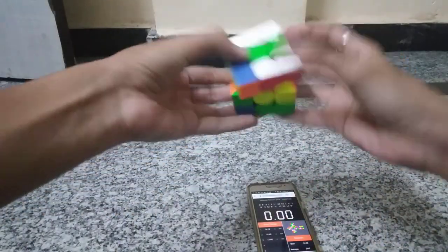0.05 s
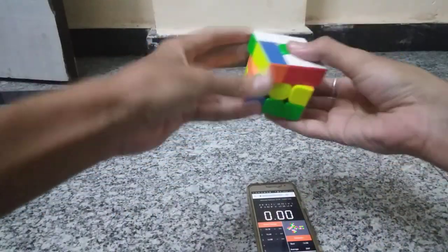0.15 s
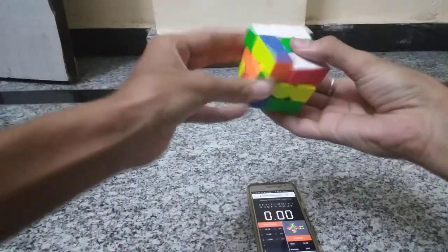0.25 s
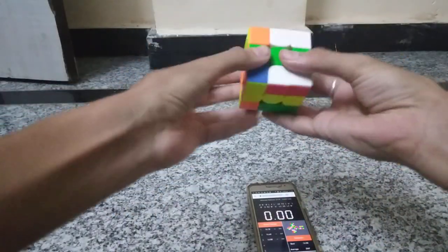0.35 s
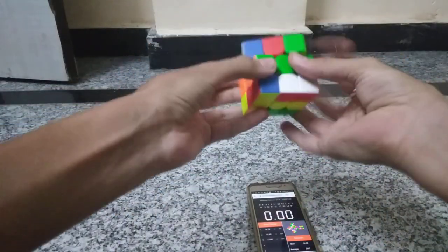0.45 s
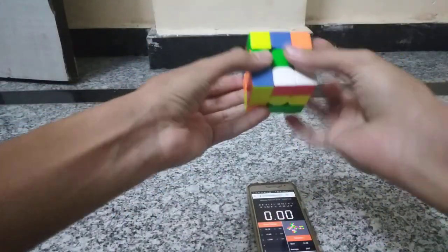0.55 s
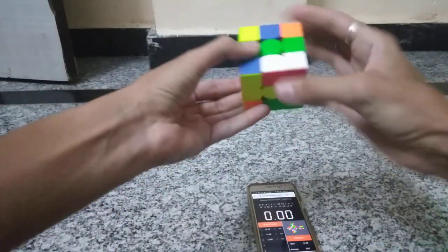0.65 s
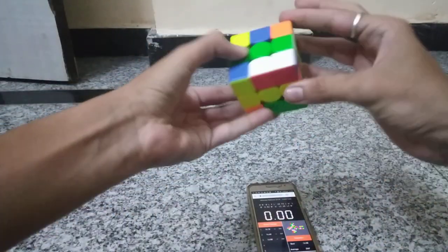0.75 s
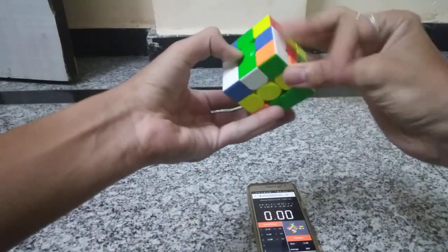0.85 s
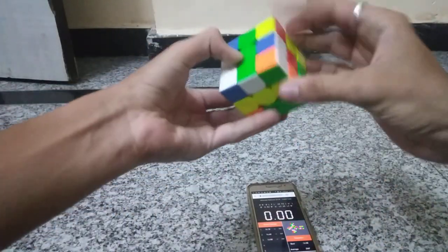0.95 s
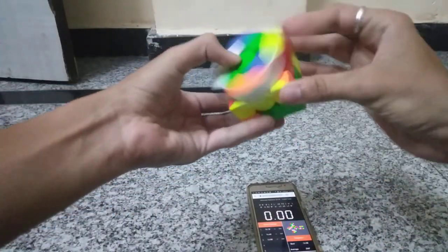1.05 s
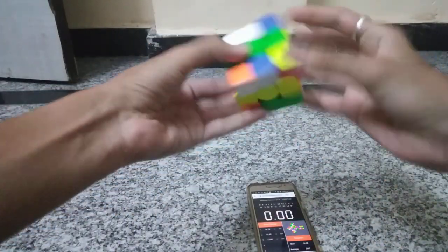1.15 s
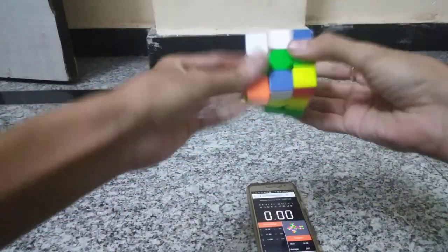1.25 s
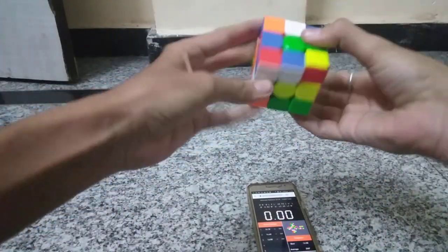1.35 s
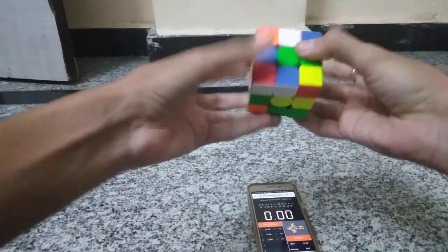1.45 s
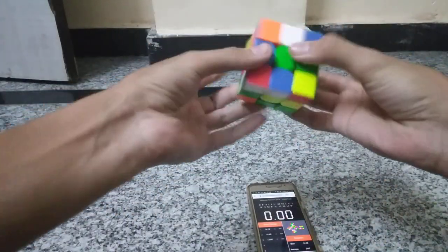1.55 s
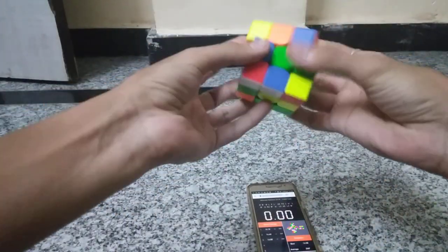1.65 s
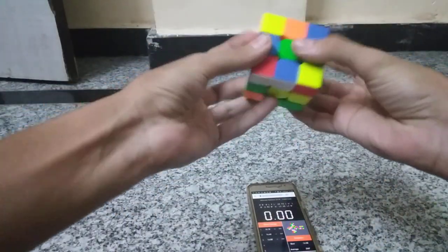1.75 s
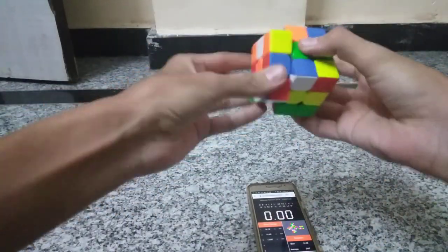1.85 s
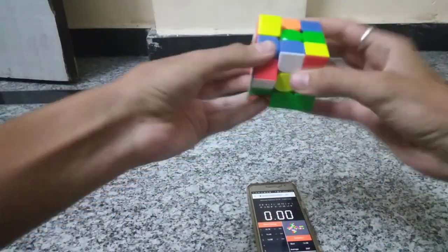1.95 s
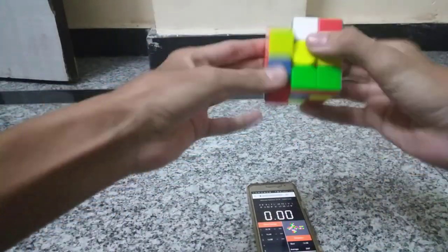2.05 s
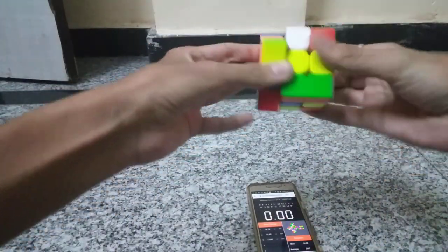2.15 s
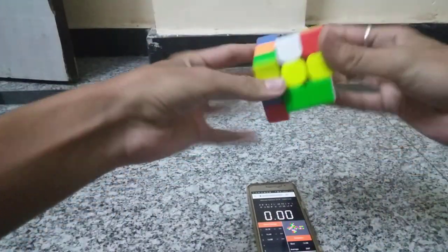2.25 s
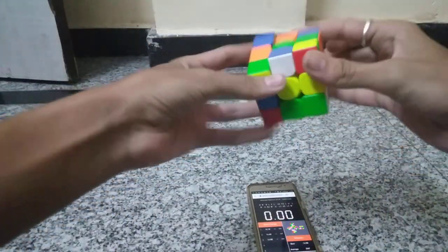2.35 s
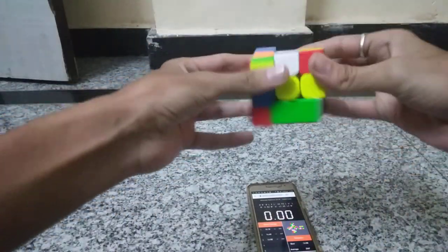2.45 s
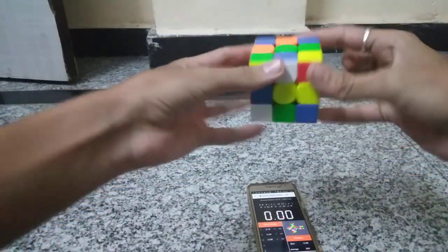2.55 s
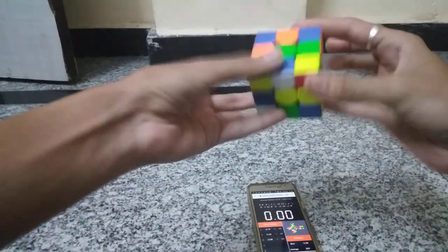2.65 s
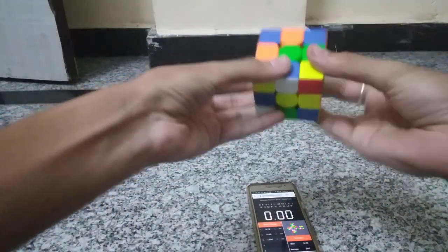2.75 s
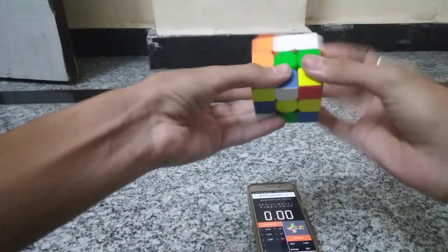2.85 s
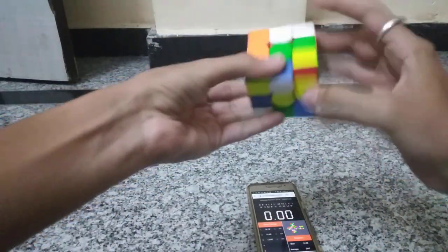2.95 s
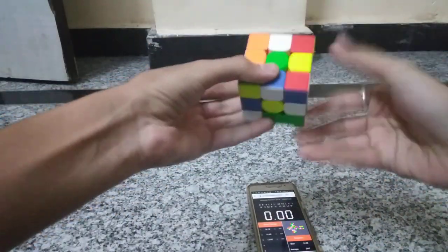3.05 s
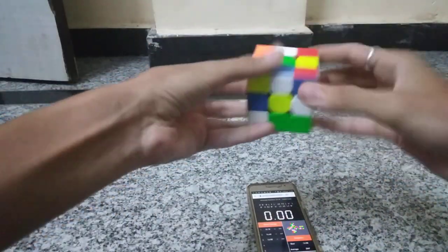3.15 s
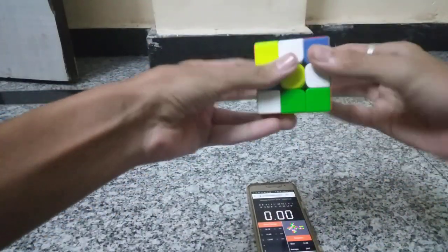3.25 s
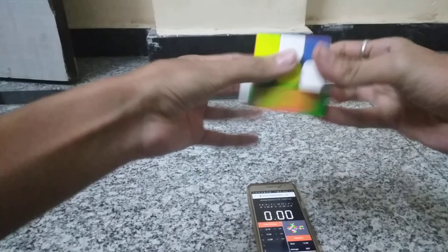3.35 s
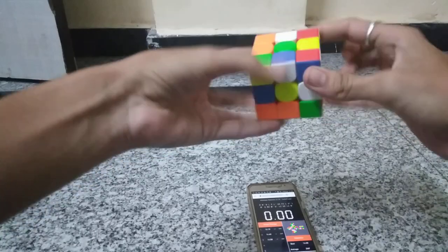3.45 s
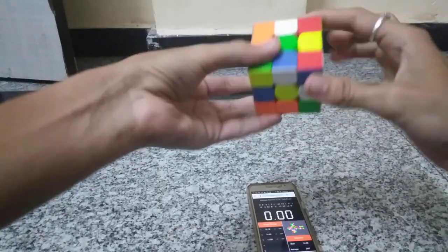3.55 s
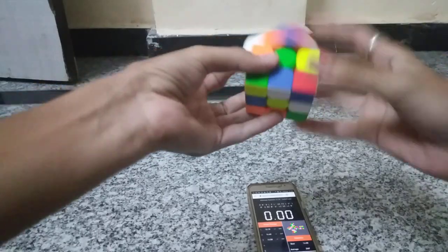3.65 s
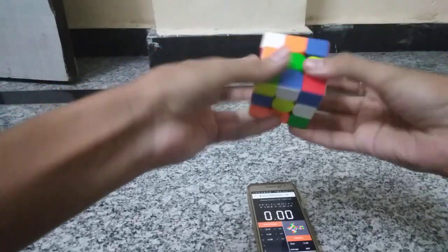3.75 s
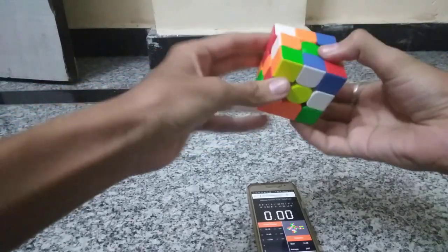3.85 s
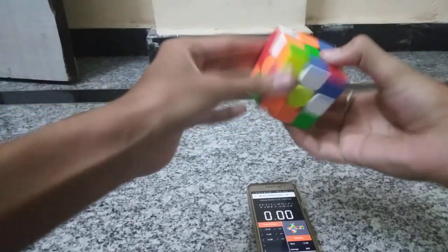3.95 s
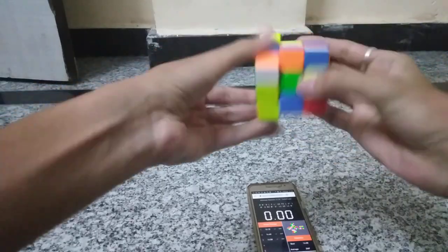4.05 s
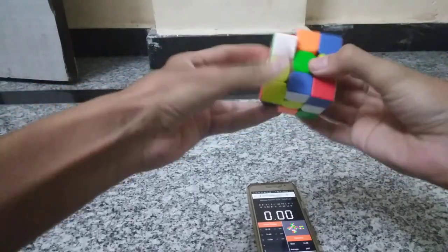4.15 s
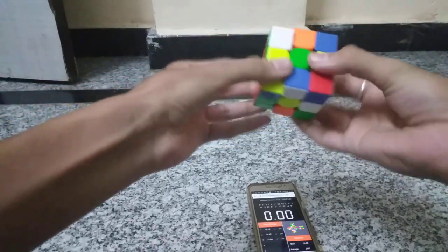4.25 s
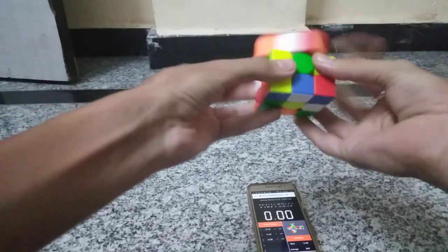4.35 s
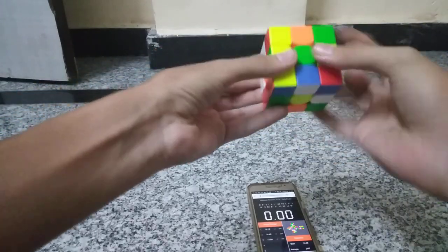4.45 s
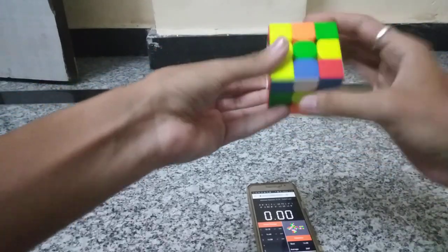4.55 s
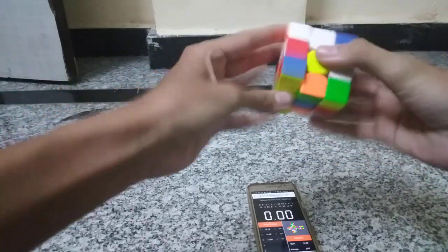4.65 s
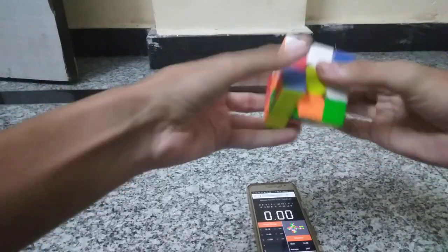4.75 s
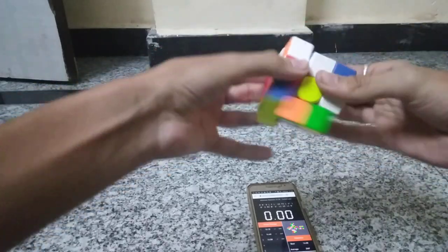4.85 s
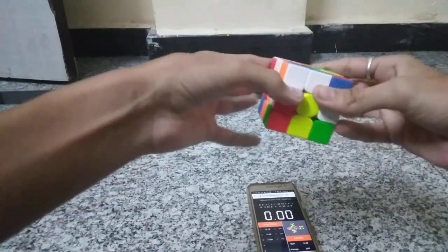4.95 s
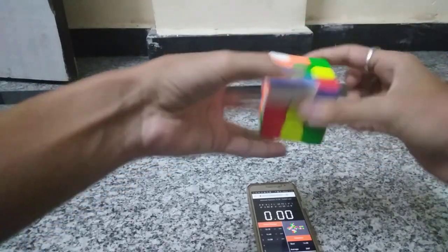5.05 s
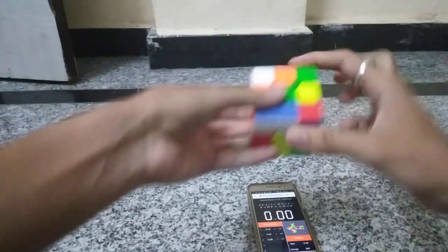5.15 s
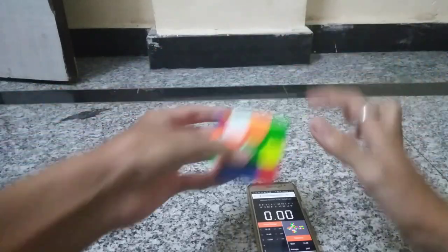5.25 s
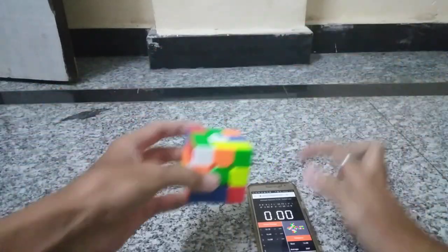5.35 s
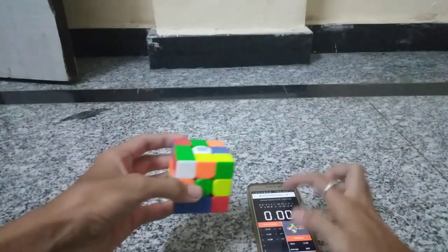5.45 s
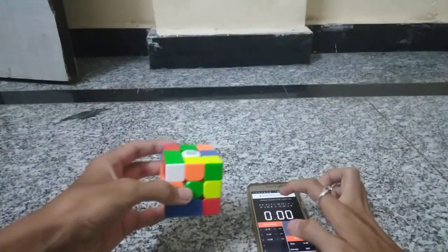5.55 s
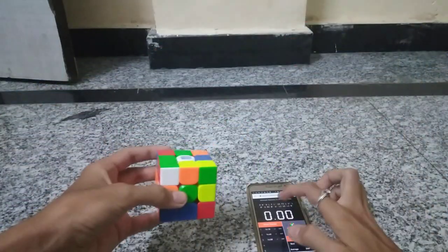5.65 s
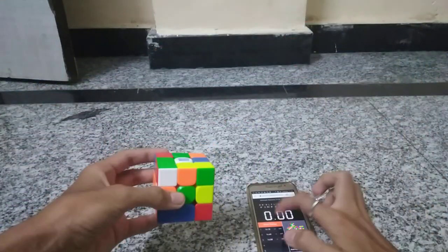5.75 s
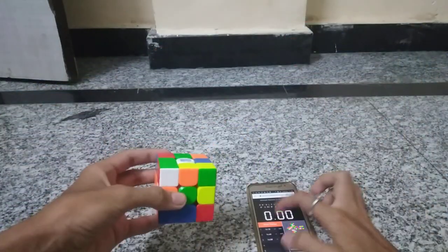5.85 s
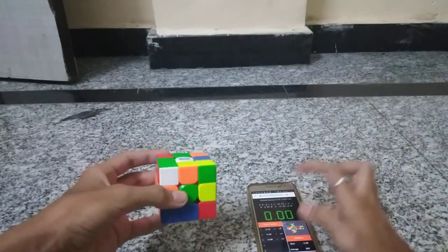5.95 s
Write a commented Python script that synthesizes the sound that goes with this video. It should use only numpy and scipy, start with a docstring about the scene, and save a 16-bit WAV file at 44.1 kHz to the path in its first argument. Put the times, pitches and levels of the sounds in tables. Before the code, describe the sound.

Fast, uneven plastic clicking and scraping from a hand-turned cube for about five seconds, followed by near silence and a soft brush of skin.

```python
"""A plastic speed cube is turned fast by hand over the stone floor of a small, hard-walled room.
Sliding layers rub as gated, ticking noise; colliding pieces excite damped modes in clusters of clicks and snaps.
Fingertips thud and brush as band-limited noise, and a dull distant wash of noise swells once.
Under them lie a low rumble of shaped noise, an unsteady hum and a faint whine of two blurred partials.
The recorder's noise gate turns the treble down whenever the treble is quiet."""
import sys
import numpy as np
from scipy import signal
from scipy.fft import rfft, irfft, next_fast_len
from scipy.io import wavfile
from scipy.ndimage import uniform_filter1d

SR = 44100
rng = np.random.default_rng(int(sys.argv[2]) if len(sys.argv) > 2 else 0)


def materialize(psi):
    """Save the field psi as 16-bit PCM at rate SR to the path in sys.argv[1].

    A 1-D psi becomes a single channel; in a 2-D psi each row is a channel.
    """
    bounded = np.clip(np.atleast_2d(psi).T, -1, 1)
    quanta = np.round(bounded * 32767).astype(np.int16)
    wavfile.write(sys.argv[1], SR, quanta)


N = 264150
TIME = np.arange(N) / SR   # s

# Layers that snap into line in two steps, catching and then seating, with loose pieces settling after:
# [catch t/s, catch level/dB, wait until seated t/s, seat level/dB, shell f/Hz, extra hollow level/dB,
#  settling level/dB]
SNAPS = [(0.3041, -49, 0.015, -18.5, 5970, 8.5, -34), (0.4472, -29, 0.0094, -19.5, 4880, 2, -40),
         (0.4728, -30.5, 0.0075, -27.5, 4900, -1, -39), (0.5048, -26.5, 0.013, -32, 5800, -1.5, -31),
         (.8574, -17, .0086, -16, 5360, 1.5, -21.5), (1.0866, -32, 0.011, -33, 5500, 0, -52),
         (1.2979, -16, 0.0057, -19, 5720, 4, -33), (1.609, -35, 0.0091, -32.5, 5200, 0.5, -35.5),
         (1.864, -39, 0.012, -52, 5450, 5, -79), (2.3548, -54, 0.0085, -29, 5500, 0.5, -53),
         (2.5222, -13, 0.0089, -15.5, 5500, -2, -31), (2.837, -36.5, 0.017, -25, 5200, 6.5, -53),
         (2.9981, -30.5, 0.015, -21.5, 3730, 5, -38), (3.383, -22.5, .0111, -20.5, 5660, 6.5, -54),
         (3.6646, -32.5, .0172, -30, 5270, -2.5, -73), (4.0132, -26.5, 0.02, -30, 5200, 3.5, -32),
         (4.353, -29.5, .004, -21.5, 5340, 2, -26), (4.4023, -31.5, 0.0053, -28.5, 5230, 2.5, -35.5),
         (4.622, -25.5, 0.012, -17, 5800, 7.5, -36), (4.6623, -26.5, 0.012, -27, 6630, 4.5, -38),
         (4.8979, -33.5, .0086, -36, 5460, -3.5, -47), (4.9364, -25.5, 0.0057, -25, 5470, 2.5, -33.5)]
EDGE_DB = -9.5   # edge band of an ordinary piece, relative to its shell band


def from_db(db):
    """Level definition: an amplitude ratio is 10 to the power of dB / 20."""
    return 10 ** (np.asarray(db) / 20)


def rms_one(x):
    """Normalization: divides a signal by its root mean square."""
    return x / np.sqrt(np.mean(x ** 2) + 1e-20)


def in_time(rows):
    """Linear interpolation of every column against the time in the first."""
    s, *columns = np.transpose(rows)
    return np.squeeze([np.interp(TIME, s, column) for column in columns])


def at_hz(points, hz):
    """Interpolation of a spectrum along a logarithmic frequency axis."""
    points_hz, values = np.array(points).T
    return np.interp(np.log(hz + 1e-9), np.log(points_hz), values)


def butter(x, hz, kind, order=2):
    """Linear filtering with a maximally flat passband."""
    sections = signal.butter(order, np.clip(hz, 10, .45 * SR), kind, fs=SR, output="sos")
    return signal.sosfilt(sections, x)


def add(out, s, sound):
    """Superposition: mixes a sound into the track at time s."""
    at = max(round(s * SR), 0)
    out[..., at:at + sound.shape[-1]] += sound[..., :N - at]


def diffuse_noise(spectrum):
    """Diffuse field: stereo noise whose left-right correlation depends on frequency; rms 1."""
    # similarity of the two channels: [f/Hz, correlation]
    likeness = [(30, 0), (70, 0.42), (250, 0.84), (600, 0), (1500, 0), (4000, 0)]
    hz = np.arange(N // 2 + 1) * SR / N
    mid, side = rfft(rng.standard_normal((2, N)))
    alike = np.clip(at_hz(likeness, hz), -1, 1)
    both = np.sqrt(1 + alike) * mid + np.sqrt(1 - alike) * side * [[1], [-1]]
    return rms_one(irfft(both * from_db(at_hz(spectrum, hz)), N))


def loose_piece(s, level_db, shell_hz=5500, spread=0.041):
    """Natural variation: an ordinary piece whose pitch scatters log-normally."""
    return s, level_db, shell_hz * np.exp(spread * rng.standard_normal()), 0, EDGE_DB


def contacts(chatter_count=2, bounces_count=3):
    """Impact sequence: single clicks, and snaps with chatter before and weakening bounces after."""
    # single pieces that knock together:
    # [t/s, level/dB, shell f/Hz, extra hollow level/dB, edge level relative to shell/dB]
    single_clicks = [(.0365, -29.5, 5280, -6.5, -7), (.067, -34, 4900, 1, -6.5),
                     (.1355, -36.5, 4380, 1, -6), (.5327, -21.5, 3900, -15.5, -8),
                     (.56, -26, 6250, -2, -16), (.8507, -33.5, 5530, 3.5, -14.5),
                     (1.0441, -29, 6340, -3.5, -1.5), (1.1502, -38, 5500, -1, 0.5),
                     (1.2545, -36.5, 5070, 1.5, -12.5), (1.3156, -22, 5570, -1.5, -7.5),
                     (1.79, -32.5, 5730, -2, -10.5), (2.029, -31, 5750, 3.5, -10),
                     (2.0603, -39, 5330, 2, -12), (2.0846, -40.5, 5730, -4, -14),
                     (2.163, -44, 6000, -4.5, -9), (2.2079, -40, 4260, -1, -18),
                     (2.2996, -55, 4700, -0.5, -39), (2.4617, -45.5, 5400, 1.5, -11),
                     (2.4936, -40, 4930, 5.5, -16.5), (2.5152, -24, 5740, 4.5, -13),
                     (2.6909, -43.5, 5340, -1, 2), (2.799, -31.5, 5900, -1.5, -3.5),
                     (2.883, -27, 5650, -11, -23), (2.9679, -31, 5430, 5, -6),
                     (2.9918, -35.5, 4900, 4, -11), (3.0414, -33, 6000, 6, -9),
                     (3.053, -32, 6170, 3.5, -13), (3.2144, -47.5, 6340, -6.5, -5.5),
                     (3.774, -35.5, 6940, -3, 4.5), (3.7929, -47.5, 5200, -1, -8),
                     (3.9276, -51.5, 4630, -11, -10), (3.9932, -39, 5270, 2.5, -10),
                     (4.0584, -33, 4950, 0, -11), (4.4429, -34.5, 5360, -6.5, -11),
                     (4.5971, -30, 5300, 2.5, -9.5), (4.7617, -50.5, 5200, 10, 4),
                     (4.861, -51, 5200, 3.5, -9.5), (5.13, -55, 5300, -8.5, -13.5),
                     (5.173, -52, 4970, -3, -3.5)]
    chatter_db, chatter_gap_s = -17, .003   # relative to the catch; mean gap between ticks
    settle_gap_s, loss_db = .010, 6.5   # mean gap between bounces; loss per bounce or earlier tick
    rows = list(single_clicks)
    for s, catch_db, wait, seat_db, hz, hollow_db, settle_db in SNAPS:
        rows.append((s, catch_db, hz, hollow_db, EDGE_DB))
        rows.append((s + wait, seat_db, hz, hollow_db, EDGE_DB))
        leads = np.cumsum(chatter_gap_s * rng.uniform(.5, 1.5, chatter_count))
        for k, lead in enumerate(leads):
            rows.append(loose_piece(s - lead, catch_db + chatter_db - loss_db * k))
        delays = np.cumsum(settle_gap_s * rng.uniform(.5, 1.5, bounces_count))
        for k, delay in enumerate(delays):
            rows.append(loose_piece(s + wait + delay, settle_db - loss_db * k))
    return np.array(rows)


def knock(t, shell_hz, crack_db=0.0, crack_t60=0.012, shell_db=12.5, shell_t60=0.0042,
          mode_spread_db=2.0, detune=0.041, port_hz=4500):
    """Modal excitation: a contact starts a noisy crack, the cube's damped modes and the shell's ring."""
    # the cube's own modes: [f/Hz, level/dB, t60/s]
    cube_modes = [(1038, -5.5, 0.041), (1287, 1, 0.016), (1613, 5, 0.018), (1869, 4.5, 0.012),
                  (2280, 2, 0.0092), (3080, -12.5, 0.0077), (3810, -2, 0.0099), (4324, -1, 0.0094),
                  (5200, 0, 0.0092), (5793, 6.5, 0.019), (6627, 12, 0.0087), (7705, 5, 0.018),
                  (8460, 0.5, 0.021), (10030, 5.5, 0.0023), (10030, -5, 0.016), (12150, -20.5, 0.018)]
    hz, level_db, t60 = np.vstack([cube_modes, (shell_hz, shell_db, shell_t60)]).T[:, :, None]
    hz = hz * (1 + detune * rng.standard_normal(hz.shape))   # the grip shifts the modes
    strength = from_db(level_db + mode_spread_db * rng.standard_normal(hz.shape))
    strength = strength * rng.choice([-1, 1], hz.shape)
    # short waves reach the two ports out of step
    skew = rng.standard_normal((2, *hz.shape)) * hz / port_hz
    # the pieces grind briefly before they ring freely
    free = np.maximum(t - .0012, 0)
    ringing = strength * np.sin(2 * np.pi * hz * t + skew) * from_db(-60 * free / t60)
    modes = ringing.sum(axis=1)
    grit = rng.standard_normal((3, len(t)))
    # lows shared by both channels, highs independent
    crack = butter(grit[0], 3600, "low") + butter(grit[1:], 3000, "high")
    return modes + 4 * from_db(crack_db) * crack * from_db(-60 * free / crack_t60)


def in_motion():
    """Kinematic gating: true while a layer is sliding."""
    # layers in motion: [start t/s, end t/s]
    turns = [(-.05, .255), (.284, .813), (0.84, 2.26), (2.35, 3.24), (3.319, 3.901), (3.985, 4.283),
             (4.325, 5.135)]
    return np.any([(TIME > start) & (TIME < end) for start, end in turns], axis=0)


def uneven_push(push_hz=14, push_db=1.5):
    """Slow modulation: the fingers never push evenly, so a gain wanders about 1."""
    return from_db(push_db * rms_one(butter(rng.standard_normal(N), push_hz, "low")))


def grains(per_s=400, spread_db=5.5, count=10):
    """Stick-slip as shot noise: random tiny catches ring differently tuned pieces; rms 1."""
    sizes = from_db(spread_db * np.minimum(rng.exponential(1, N), 3)) * rng.choice([-1, 1], N)
    catches = sizes * (rng.random(N) < per_s / SR)
    piece = rng.integers(0, count, N)
    t = np.arange(SR // 60) / SR
    out = 0
    for k, shell_hz in enumerate(np.geomspace(3500, 6800, count)):
        own_catches = (catches * (piece == k))[None]
        out = out + signal.oaconvolve(own_catches, knock(t, shell_hz), axes=1)[:, :N]
    return rms_one(butter(butter(out, 1578, "high"), 10740, "low", order=3))


def rubbing(knocks, rattle_db=-12.0, lead_s=0.0012, trail_s=0.0065, grain_db=-1.5, hiss_db=-3.5):
    """Friction: sliding force scales hiss and ticks, swelling at each snap and rattling around each knock."""
    # friction hiss: [f/Hz, spectral level/dB]
    rub_spectrum = [(400, -12.5), (800, -15.5), (1200, -9), (1700, -2), (3000, 5), (6000, 3.5), (8000, -11),
                    (10500, -20), (13000, -27.5), (16000, -31)]
    # force levels, before the grain and hiss shares: steady slide; scrape relative to the seating knock
    slide_db, run_up_db = -59.5, -23
    run_up_s, brake_s = 0.0095, 0.0098   # time constants of growing and stopping
    force = from_db(slide_db) * uneven_push() * uniform_filter1d(in_motion() * 1.0, size=600)
    t = np.arange(-SR // 30, SR // 25) / SR
    # a layer speeds up into each snap
    for s, _, wait, seat_db, *_ in SNAPS:
        scrape = np.exp(np.minimum(t / run_up_s, -t / brake_s))
        add(force, s + wait + t[0], from_db(seat_db + run_up_db) * scrape)
    for s, level_db, *_ in knocks:
        rattle = np.exp(np.minimum(t / lead_s, -t / trail_s))
        add(force, s + t[0], from_db(level_db + rattle_db) * rattle)
    return force * (from_db(grain_db) * grains() + from_db(hiss_db) * diffuse_noise(rub_spectrum))


def background(hum_hz=69, hum_width_hz=10, hum_db=-60.5):
    """Stationary noise: a steady shaped rumble, and a narrow band that beats as an unsteady low hum."""
    # room rumble: [f/Hz, spectral level/dB]
    rumble_spectrum = [(15, 6), (30, 6.5), (55, 2.5), (90, -4), (140, -10.5), (200, -9.5), (350, -17),
                       (500, -17), (680, -19.5), (1000, -28), (3000, -30), (7000, -41.5), (16000, -45)]
    rumble = from_db(-54) * diffuse_noise(rumble_spectrum)
    band = [hum_hz - hum_width_hz / 2, hum_hz + hum_width_hz / 2]
    # the first second, while the filter builds up, is dropped
    hum = rms_one(butter(rng.standard_normal(N + SR), band, "band")[SR:])
    return rumble + from_db(hum_db) * hum


def whine(waver=0.7, overtone_db=-4.5, blur_hz=18):
    """Random modulation: a gliding tone and its octave are blurred into narrow bands."""
    # faint far whine: [t/s, f/Hz, level/dB]
    whine_path = [(0, 1036, -96), (5.0, 1058, -88.5), (5.4, 1052, -76), (5.7, 1020, -73.5),
                  (5.99, 995, -76)]
    hz, db = in_time(whine_path)
    phase = 2 * np.pi * np.cumsum(hz) / SR
    wander = rms_one(butter(rng.standard_normal((2, 2, N)), blur_hz, "low"))
    strength = (1 + waver * (wander[0] + 1j * wander[1])) / np.sqrt(1 + 2 * waver ** 2)
    tone = np.exp(1j * phase) + from_db(overtone_db) * np.exp(2j * phase)
    return from_db(db) * np.real(strength * tone)


def clicks(knocks, seat_s=0.0003, click_db=0.0, bottom_hz=640, hollow_hz=2750, edge_hz=7400):
    """Impact spectrum: hardness and place of contact weight the hollow, shell, edge and crisp bands."""
    medium_db = -30   # level of a medium knock
    # band levels at a medium knock, and their change per dB of knock level:
    # the harder the knock, the less the hollow of the cube counts against the shell
    base_hollow_db, hollow_db_per_db = -11, -0.5081
    # a thin, crisp tick, relatively clearest in the lightest knocks
    base_crisp_db, crisp_db_per_db, crisp_hz = -26, -0.13, 11900
    out, t = np.zeros((2, N)), np.arange(SR // 40) / SR
    unit_energy = 2 * .002 * SR   # unit rms for 2 ms in two channels
    for s, level_db, shell_hz, extra_db, edge_db in knocks:
        harder_db = level_db - medium_db
        hollow_db = base_hollow_db + hollow_db_per_db * harder_db + extra_db
        crisp_db = base_crisp_db + crisp_db_per_db * harder_db + edge_db - EDGE_DB
        hit = knock(t, shell_hz) * np.minimum(t / seat_s, 1)   # contact builds as the piece seats
        hollow = butter(butter(hit, bottom_hz, "high"), hollow_hz, "low", order=4)
        shell = butter(hit, [hollow_hz, edge_hz], "band", order=4)
        edge = butter(butter(hit, edge_hz, "high", order=4), 10450, "low", order=7)
        crisp = butter(hit, crisp_hz, "high", order=4)
        for part, db in [(hollow, hollow_db), (shell, 0), (edge, edge_db), (crisp, crisp_db)]:
            to_unit = np.sqrt(unit_energy / np.sum(part ** 2))
            add(out, s, part * from_db(click_db + level_db + db) * to_unit)
    return out


def pats(pat_db=-10.5, flesh_hz=520):
    """Soft impact: yielding fingertips give a short low thud without treble."""
    # fingers land as the grip changes: [t/s, level before pat_db/dB]
    grip_changes = [(0.134, -38.5), (2.797, -37.5), (4.357, -46), (4.599, -42)]
    # the hand takes up each snap: 23 dB under the seating knock, before pat_db
    taken_up = [(s + wait, seat_db - 23) for s, _, wait, seat_db, *_ in SNAPS]
    out, t = np.zeros(N), np.arange(SR // 12) / SR
    fade = from_db(-60 * t / .05)
    for s, db in list(grip_changes) + taken_up:
        thud = butter(rng.standard_normal(len(t)) * fade, [140, flesh_hz], "band")
        add(out, s, from_db(db + pat_db) * thud / np.abs(thud).max())
    return out


def room_response(build_s=0.012):
    """Reverberation: a few near reflections and a diffuse tail that decays separately in each band."""
    # reverberation time: [f/Hz, t60/s]
    tail_t60 = [(200, 0.82), (1000, 0.26), (3000, 0.54), (6000, 0.57), (10000, 0.42), (16000, 0.273)]
    # tail relative to direct sound: [f/Hz, level/dB]
    tail_level = [(200, 0.5), (1000, -7.5), (2000, -8.5), (4000, -8), (6000, -9.5), (10000, -9),
                  (16000, -17.5)]
    # reflections from floor and near walls: [delay t/s, level/dB]
    reflections = [(.0027, -22.5), (.0052, -19), (.0091, -24.5), (0.0175, -15)]
    t = np.arange(int(.7 * SR)) / SR
    response, edges = np.zeros((2, len(t))), np.geomspace(120, 18000, 15)
    white = rng.standard_normal((2, 2, len(t)))
    for k, (low, high) in enumerate(zip(edges, edges[1:])):
        hz = np.sqrt(low * high)
        fade = from_db(-60 * t / at_hz(tail_t60, hz)) * (1 - np.exp(-t / build_s))
        fade = fade / np.sqrt(np.sum(fade ** 2))
        # neighbouring bands use different noise
        response += butter(white[k % 2], [low, high], "band") * fade * from_db(at_hz(tail_level, hz))
    for s, db in reflections:
        at = (s * SR * rng.uniform(.93, 1.07, 2)).astype(int)   # one delay for each channel
        response[[0, 1], at] += from_db(db)
    return response


def room(x, knocks, count=4):
    """Directivity: contacts radiate from changing sides of the cube, so responses alternate in turn."""
    times = np.sort(knocks[:, 0])
    midpoints = (times[1:] + times[:-1]) / 2
    side = np.searchsorted(midpoints, TIME) % count
    return x + sum(signal.oaconvolve(x * (side == k), room_response(), axes=1)[:, :N]
                   for k in range(count))


def wash():
    """Enveloped noise: a dull, distant rush swells, holds, then decays exponentially."""
    # distant rush: [f/Hz, spectral level/dB]
    wash_spectrum = [(100, -2), (220, -4.5), (400, -3), (700, -0.5), (1500, -2), (2400, 2), (4000, -7.5),
                     (7000, -27), (12000, -50)]
    start_s, attack_s, hold_s = 2.884, 0.11, .2
    fall_db_per_s, level_db = 49, -46
    age = TIME - start_s
    fall_db = fall_db_per_s * np.maximum(age - attack_s - hold_s, 0)
    return np.clip(age / attack_s, 0, 1) * from_db(level_db - fall_db) * diffuse_noise(wash_spectrum)


def hands():
    """Soft friction: skin brushes as noise that swells and fades after the cube is still."""
    # shifts of the hands: [peak t/s, length t/s, level/dB]
    rustles = [(5.24, 0.061, -71.5), (5.503, 0.13, -76), (5.855, 0.11, -61)]
    # brushing skin: [f/Hz, spectral level/dB]
    skin_spectrum = [(120, -5), (300, -6), (550, -1.5), (1000, -14), (3500, -16.5), (7000, -27),
                     (14000, -48)]
    swell = sum(from_db(db) * np.exp(-((TIME - s) / length) ** 2) for s, length, db in rustles)
    return swell * diffuse_noise(skin_spectrum)


def scene():
    """Superposition of the cube and fingertips in the room, the brushing hands and the background."""
    knocks = contacts()
    cube = clicks(knocks) + rubbing(knocks) + pats()
    return room(cube, knocks) + hands() + background() + wash() + whine()


def microphones(x):
    """Port resonance: the left-right balance varies with frequency at constant summed power gain."""
    # microphone colour: [f/Hz, left relative to right level/dB]
    port_balance = [(100, -3), (1000, -2.5), (1700, 0), (3700, 0), (5000, 6), (6300, 10.5), (7200, 5),
                    (8300, -2.5), (10000, -16.5), (11500, -13.5), (14000, 0.5)]
    size = next_fast_len(N + 4096)
    ratio = from_db(at_hz(port_balance, np.arange(size // 2 + 1) * SR / size))
    gains = np.array([ratio, np.ones_like(ratio)]) * np.sqrt(2 / (1 + ratio ** 2))
    padded = np.pad(x, [(0, 0), (0, size - N)], mode="reflect")
    return irfft(rfft(padded) * gains, size)[:, :N]


def noise_gate(x, open_db=-55.5, knee_db=8.0, depth_db=-14.0, split_hz=1000):
    """Downward expansion: the treble is turned down while its own level stays under the threshold."""
    low = butter(butter(x, split_hz, "low", order=4), split_hz, "low", order=4)
    high = butter(butter(x, split_hz, "high", order=4), split_hz, "high", order=4)
    power = np.abs(uniform_filter1d(np.mean(high ** 2, axis=0), size=700))
    level_db = 10 * np.log10(power + 1e-14)
    shut = np.clip((open_db - level_db) / knee_db, 0, 1)
    return low + high * from_db(depth_db * uniform_filter1d(shut, size=400))


def record(dry):
    """Recording chain: port colour, noise gate, then a steep band limit at 16 kHz."""
    gated = noise_gate(microphones(dry))
    return signal.sosfilt(signal.ellip(10, .1, 80, 16000, fs=SR, output="sos"), gated)


dry = scene()
out = record(dry)
materialize(out)
```